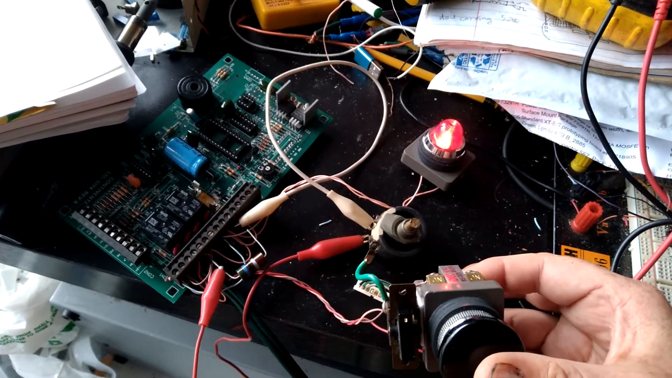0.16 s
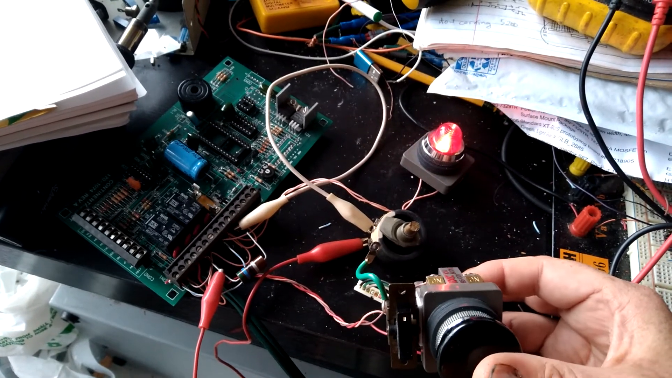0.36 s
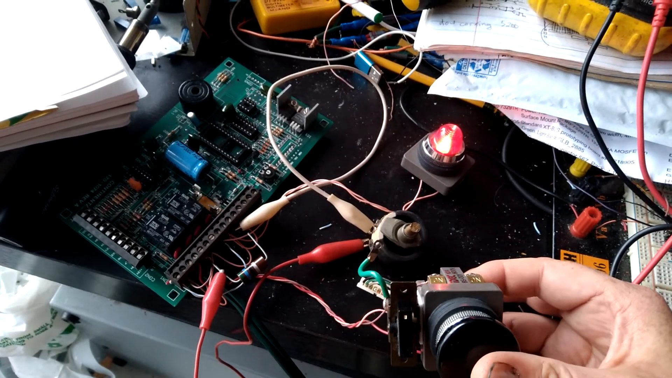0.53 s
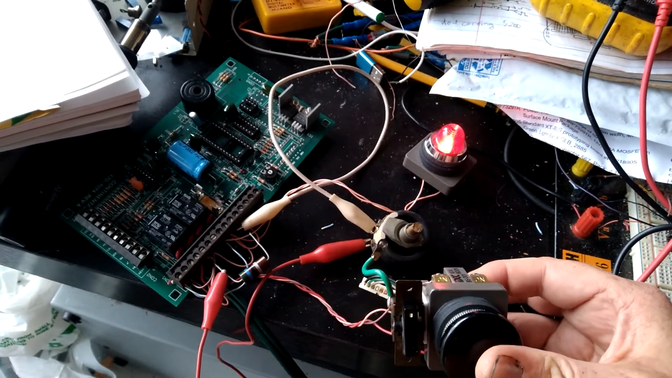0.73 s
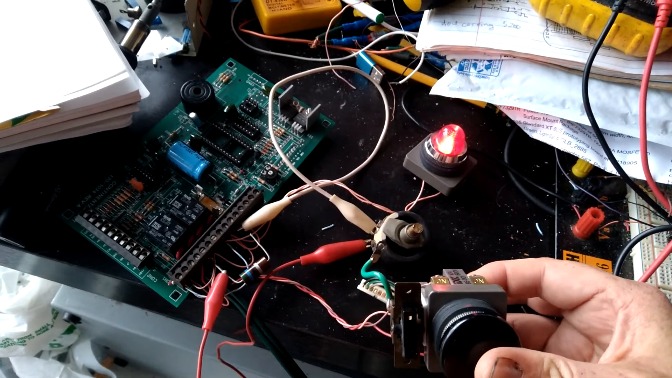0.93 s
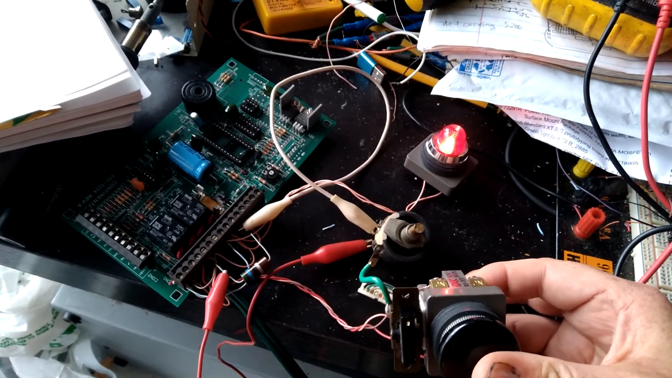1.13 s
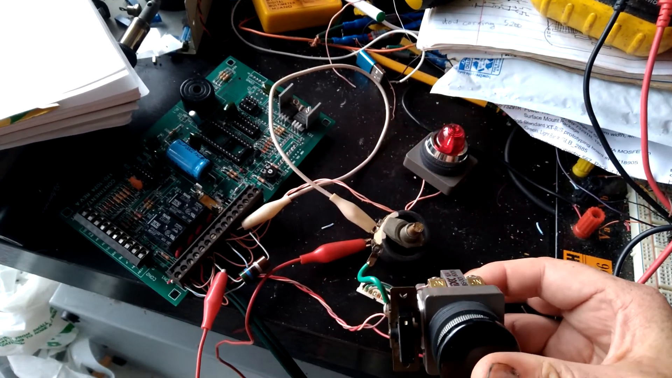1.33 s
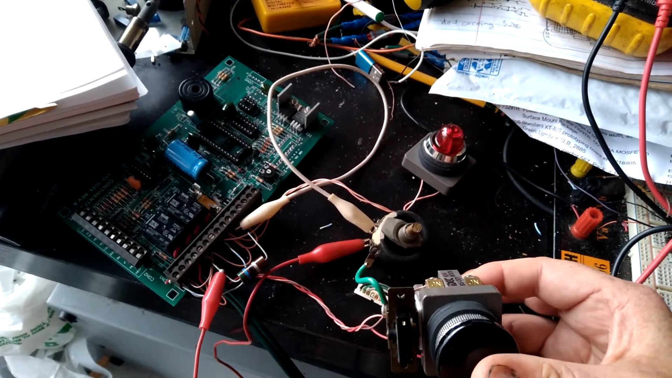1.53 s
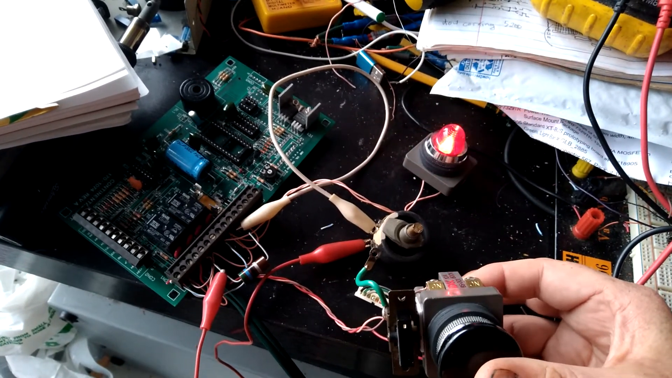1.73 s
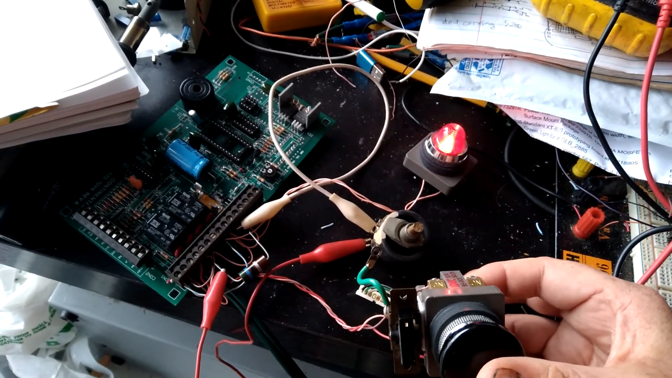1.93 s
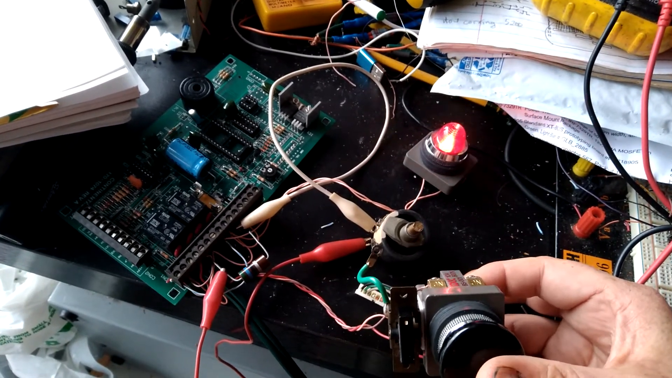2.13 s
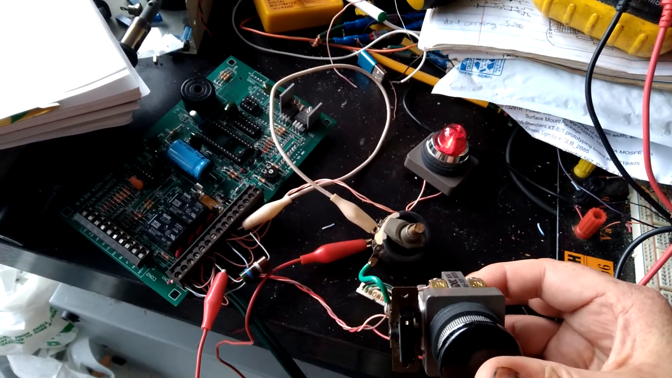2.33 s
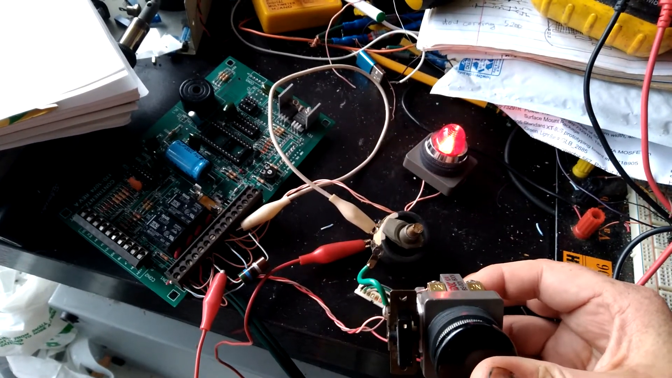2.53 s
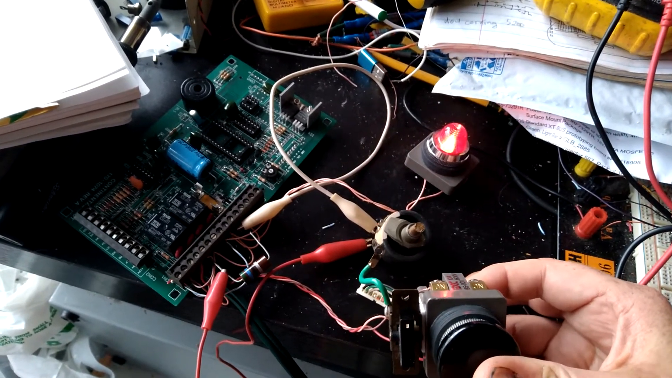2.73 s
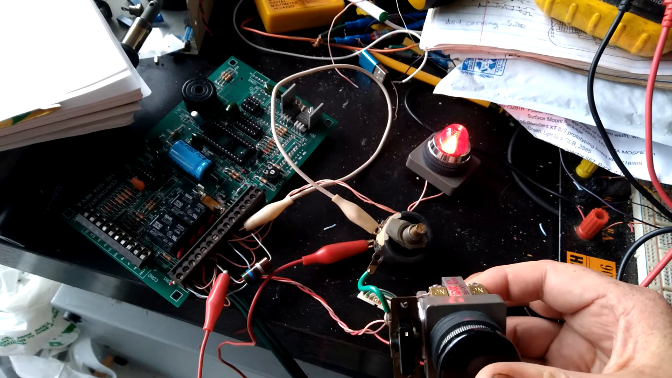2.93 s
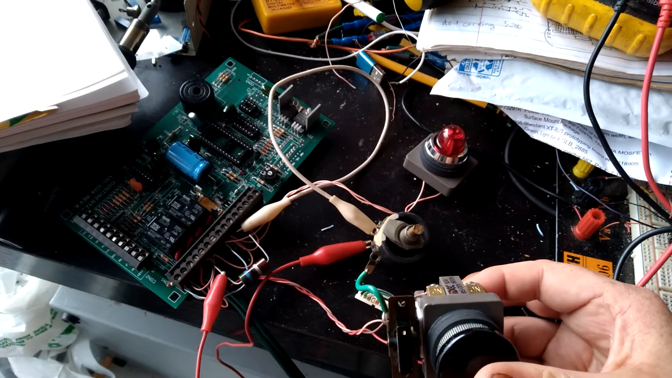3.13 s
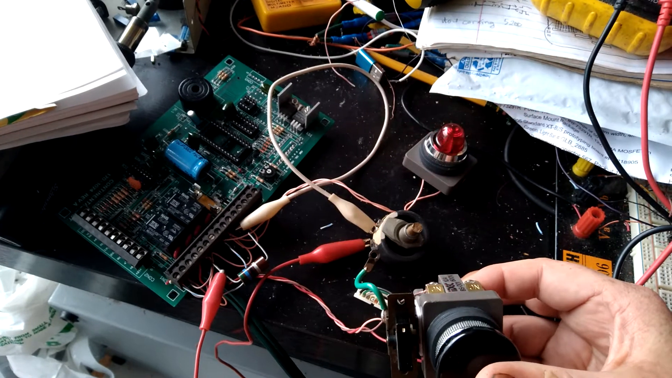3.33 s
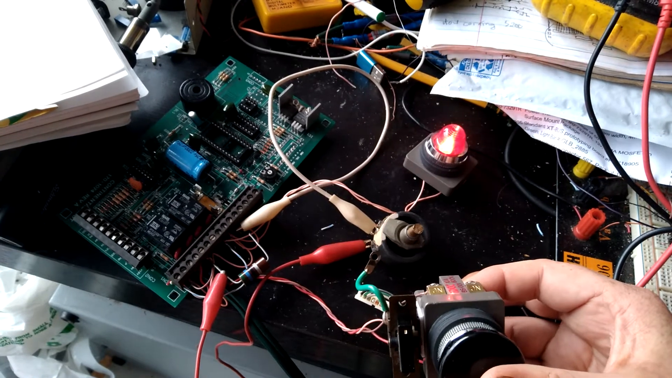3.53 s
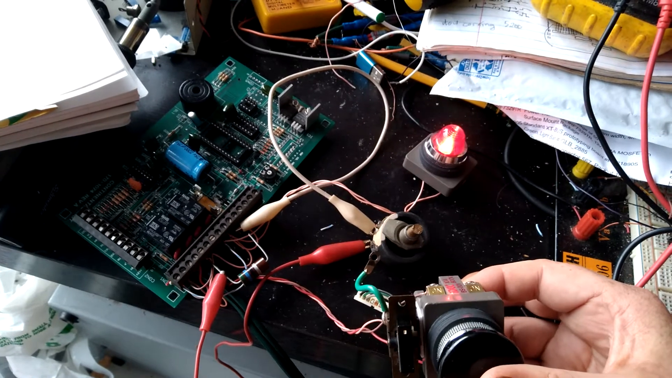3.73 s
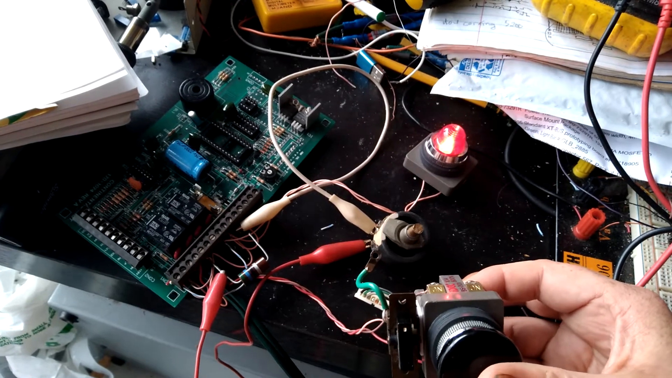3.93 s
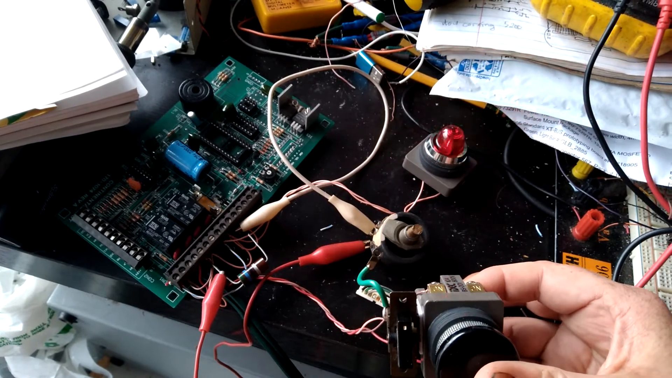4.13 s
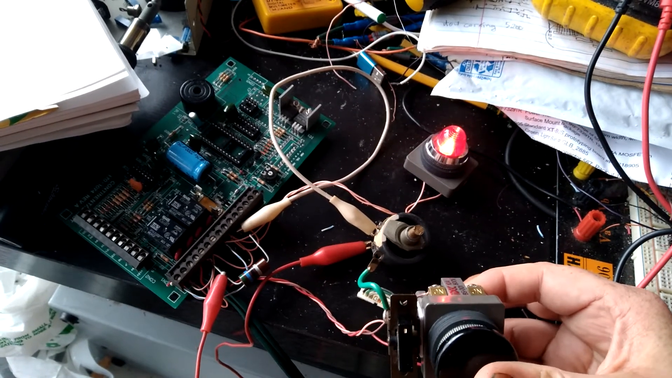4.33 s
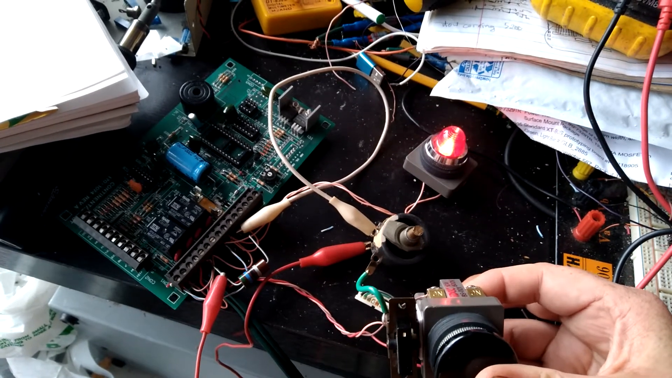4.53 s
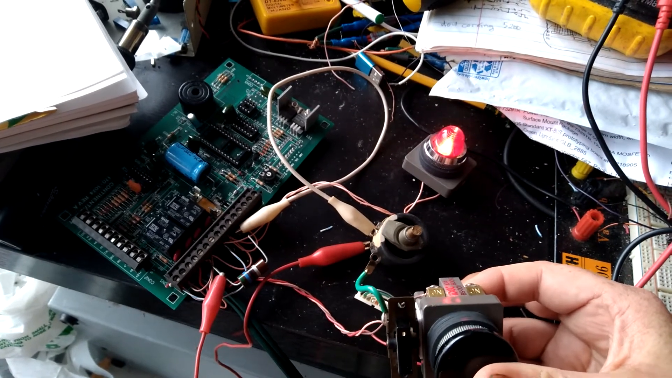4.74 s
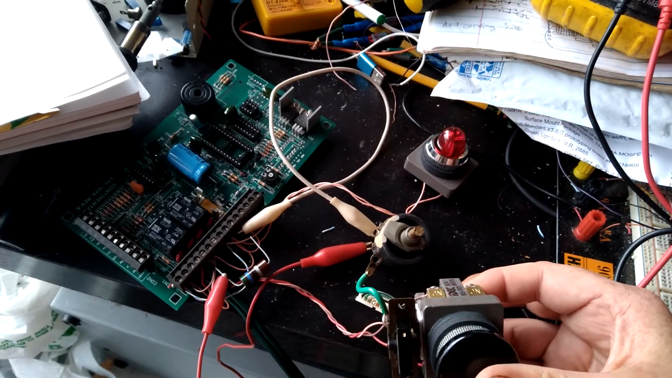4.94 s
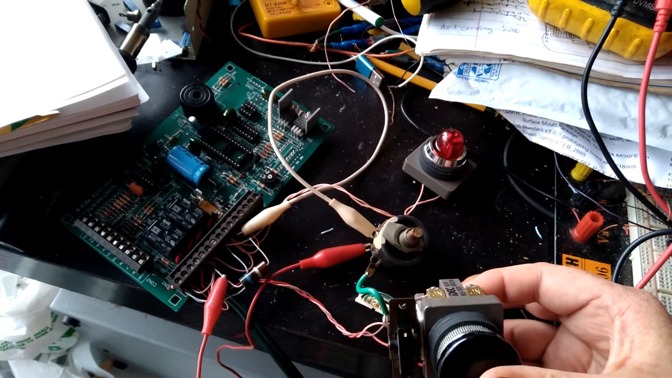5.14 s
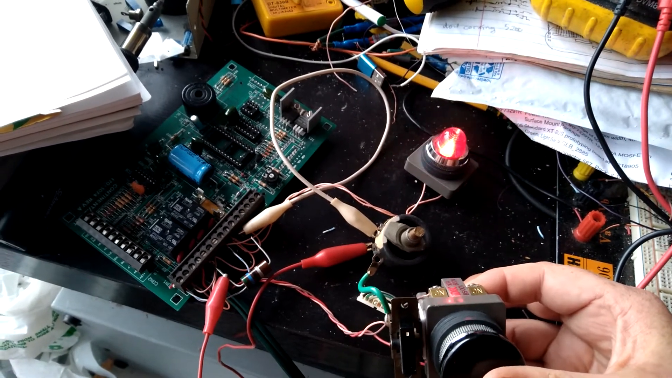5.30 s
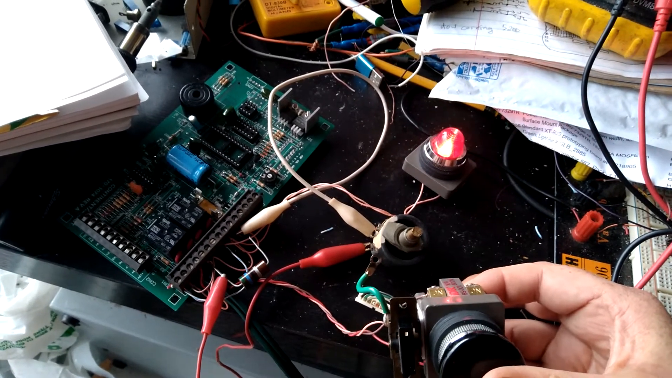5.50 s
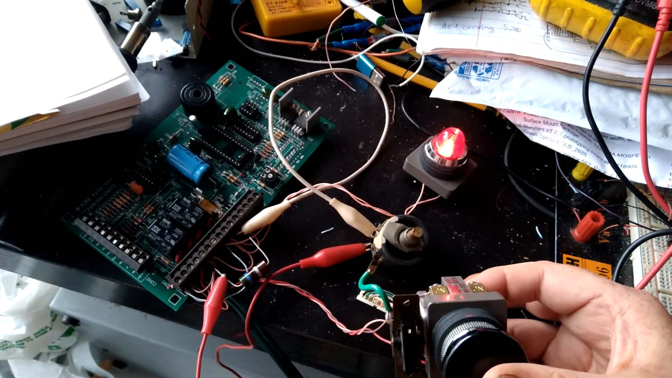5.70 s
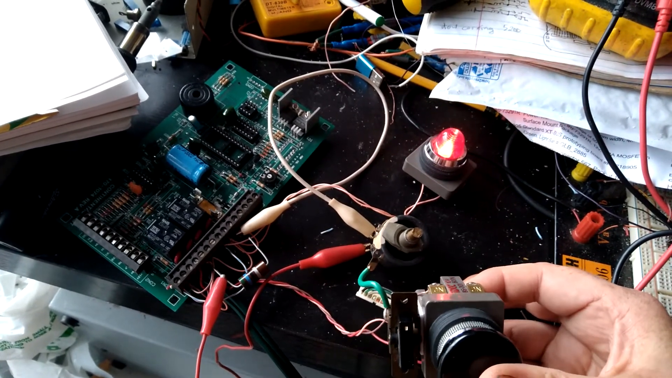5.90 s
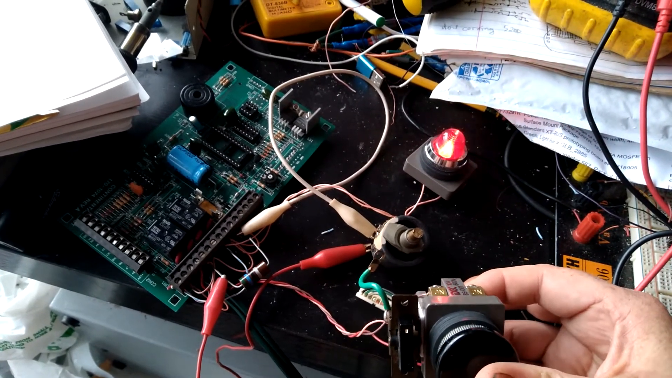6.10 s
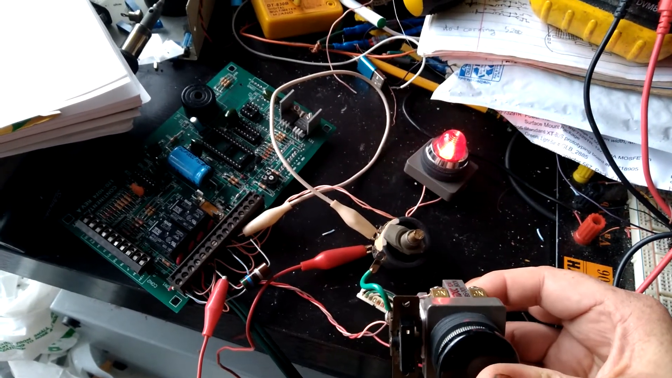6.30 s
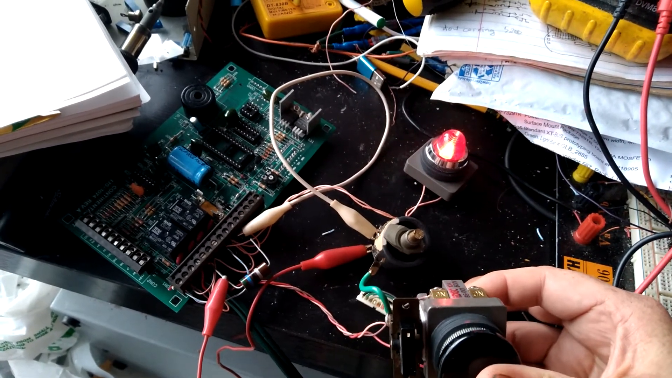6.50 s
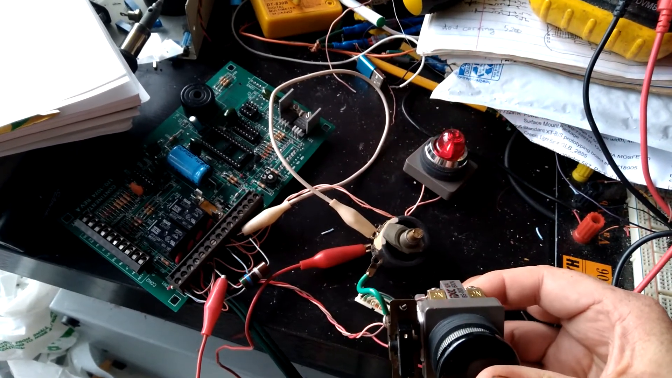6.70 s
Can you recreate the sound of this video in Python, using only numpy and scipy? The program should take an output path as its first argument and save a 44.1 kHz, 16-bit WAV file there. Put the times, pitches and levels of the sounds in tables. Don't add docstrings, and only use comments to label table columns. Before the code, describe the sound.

Dry, hard metallic switch clicks come in uneven pairs: a softer click and a very loud crack, then a softer click and a medium springy snap. They ring only briefly, with quick reflections from bench clutter and close walls. Light skin and plastic ticks scatter between strokes. Quiet low hum surges gently underneath, slight treble hiss swells around the handling, and sparrows chirp faintly outside. Close stereo pickup, clicks leaning right.

```python
import sys
import numpy as np
from scipy import signal
from scipy.io import wavfile
from scipy.ndimage import uniform_filter1d

SR = 44100
rng = np.random.default_rng(int(sys.argv[2]) if len(sys.argv) > 2 else 0)


def nominal_scale(level):
    x = np.asarray(level, float) / 20
    return 10 ** x


def dump(signal):
    limited = np.clip(np.atleast_2d(signal).T, -1, 1)
    pcm = np.round(limited * 32767).astype(np.int16)
    wavfile.write(sys.argv[1], SR, pcm)


N = 298116
SHORT, LONG, GAP = 512, 3000, 12
LEFT_LAG_SAMPLES = 10


def evened(x):
    return x / np.sqrt(np.mean(x ** 2) + 1e-20)


def read(points, hz):
    f, value = np.transpose(points)
    return np.interp(np.log(hz + 1), np.log(f + 1), value)


def add(mix, s, sound, pan_db):
    for side, lag in ((0, LEFT_LAG_SAMPLES), (1, 0)):
        part = mix[side, round(s * SR) + lag:][:len(sound)]
        part += sound[:len(part)] * nominal_scale(pan_db * (.5 - side))


def causal(points):
    hz = abs(np.fft.fftfreq(4 * SHORT, 1 / SR))
    log_gain = np.log(nominal_scale(read(points, hz)))
    click = np.fft.ifft(np.exp(np.conj(signal.hilbert(log_gain)))).real[:SHORT]
    return click / abs(click).max()


def resonate(x, hz, width_hz):
    r = np.exp(-np.pi * width_hz / SR)
    return 2 * signal.lfilter([1 - r], [1, -r * np.exp(2j * np.pi * hz / SR)], x + 0j).real


def rung(modes, t):
    return sum(nominal_scale(db - 60 * t / t60) * np.sin(2 * np.pi * hz * t) for hz, db, t60 in modes)


def tail(decays, start_s):
    uneven_db = 5
    taps = np.zeros((2, SR // 2))
    at = np.arange(0, SR // 2 - GAP, GAP)
    at = at + rng.integers(0, GAP, (2, len(at)))
    strength = rng.choice([-1., 1.], at.shape) * nominal_scale(uneven_db * rng.standard_normal(at.shape))
    onset = np.clip(at / SR / start_s - 1, 0, 1)
    np.put_along_axis(taps, at, strength * onset, 1)
    hz, t, z = signal.stft(taps, SR, nperseg=128)
    decay = nominal_scale(-60 * t / read(decays, hz)[:, None])
    taps = signal.istft(z * decay, SR, nperseg=128)[1]
    return taps / np.linalg.norm(taps[0])


def swells(rows, rise_db_per_s, fall_db_per_s, rest_db):
    t = np.arange(0, N + SHORT, GAP) / SR
    peaks = [db - np.maximum(rise_db_per_s * (s - t), fall_db_per_s * (t - s)) for s, db in rows]
    return np.repeat(np.maximum(np.max(peaks, axis=0), rest_db), GAP)[:N]


# (time [s], level [dB])
SURGES = [(0.0, 1), (.33, 9), (.65, 6), (.95, 5.5), (1.33, 7.5), (1.66, 9), (2.25, 10.5), (2.6, 3),
          (3.0, 4), (3.7, 4.5), (4.15, 8), (4.65, 4.5), (5.1, 10.5), (5.42, 7.5), (5.85, 6.5), (6.24, 10.5),
          (6.57, 11.5)]


def load_db():
    level_db = swells(SURGES, rise_db_per_s=80, fall_db_per_s=34.5, rest_db=1.5)
    return level_db - level_db.mean()


# (frequency [Hz], level [dB per Hz])
AIR = [(21, -40), (35, -16), (65, -2), (127, -1.5), (168, -8.5), (218, -8.5), (305, -19.5), (346, -16.5),
       (484, -19.5), (853, -18.5), (2000, -27.5), (3260, -37.5), (5740, -41.5), (9610, -38), (11500, -44.5),
       (15300, -40), (16500, -43)]
# (frequency [Hz], left-right likeness [-1..1])
LIKENESS = [(60, 0.93), (130, 0.92), (290, 0.85), (640, 0.35), (1410, 0.0011), (3100, -1.7), (6820, 0.44),
            (15000, -0.02)]
# (frequency [Hz], left over right [dB])
LEAN = [(60, 0), (150, -1.5), (380, 2), (950, -1), (2380, 0), (5980, -2.5), (15000, -3)]
# (frequency [Hz], left lead [rad])
LEAD = [(20, -0.3), (70, -.3), (150, -.3), (300, -.6), (600, -2), (3620, -9.5), (7060, -14), (14200, -10)]


def air():
    level_db, patch_db = -66, 1.8
    frames, hz = N // SHORT + 5, np.fft.rfftfreq(4 * SHORT, 1 / SR)
    a, b, c, d, patches = rng.standard_normal((frames, len(hz), 5)).T
    patches = uniform_filter1d(patches, size=20, axis=0)
    patches = evened(uniform_filter1d(patches, size=8, axis=1))
    same = np.clip(read(LIKENESS, hz), -1, 1)[:, None]
    left = a + 1j * b
    right = same * left + np.sqrt(1 - same ** 2) * (c + 1j * d)
    z = np.array([left, right])
    z[0] *= (nominal_scale(read(LEAN, hz)) * np.exp(1j * read(LEAD, hz)))[:, None]
    swell_db = load_db()[np.minimum(np.arange(frames) * SHORT, N - 1)]
    motor_share = read([(110, 0.8), (400, 0.0), (2000, 0.059)], hz)[:, None]
    colour_db = read(AIR, hz) + read([(2500, 3.0), (5000, -6.5)], hz)
    z *= nominal_scale(colour_db[:, None] + patch_db * patches + motor_share * swell_db)
    noise = signal.istft(z, nperseg=4 * SHORT, noverlap=3 * SHORT)[1][:, :N]
    return nominal_scale(level_db) * evened(noise)


# (frequency [Hz], width [Hz], level [dB])
HUM = [(118.2, 4.9, -69), (128.35, 5.1, -72), (205.5, 9.9, -83), (238.4, 6, -90.5), (296.8, 13, -88),
       (9500, 90, -107)]


def hum():
    swell_db = load_db()
    t, out = np.arange(N) / SR, np.zeros(N)
    for hz, width_hz, db in HUM:
        waver = resonate(rng.standard_normal(N), hz, width_hz)
        waver = evened(resonate(waver, hz, width_hz))
        steady = np.sin(2 * np.pi * (hz * t + rng.random()))
        line = steady + (0.99 + 1.1 * (hz > 150)) * waver
        out += nominal_scale(db - 2.0 + 1.2 * (hz < 150) * swell_db) * line
    return out * nominal_scale(np.array([[-1.2], [1.2]]))


# (delay [s], length [s], start [x pitch], end [x pitch], level [dB])
CHIRRUP = [(0.01, 0.053, 1, 1.09, -1), (.068, 0.059, .755, .85, 0.5), (-.015, 0.035, 0.52, 3, -9),
           (-0.0043, 0.047, 1.1, 1.6, -3.5), (0.018, .045, 1.4, 1.5, -7.5)]
CHEEP = [(0, 0.026, 1, 1, -0.94), (0.026, .034, 0.97, .76, -3.5)]
FALL = [(0.003, 0.03, 0.95, .78, -4.5)]
PEEP = [(0.0012, 0.17, 0.91, 0.99, 0.0049)]
# (time [s], pitch [Hz], level [dB])
CHIRRUPS = [(1.078, 4670, -73), (2.215, 4590, -70), (5.62, 4656, -72.5)]
CHEEPS = [(1.375, 4750, -67.5), (3.604, 4750, -68.5), (4.718, 4480, -74)]
FALLS = [(.463, 4910, -68.5), (1.22, 5440, -72.5), (1.972, 4740, -73.5), (2.035, 4274, -76.5),
         (5.8, 4600, -65.5)]
PEEPS = [(.18, 2286, -83.5), (.34, 1822, -83), (3.69, 2900, -88), (1.41, 2740, -90), (1.87, 5200, -90),
         (1.95, 5066, -84.5), (3.34, 5050, -89.5)]


def sparrows():
    wobble_hz, third_db = 139.64, -3.5
    dry, rasp = np.zeros((2, N)), rng.standard_normal((2, N))
    breath, hoarse = evened(resonate(rasp[0], 0, 430)), evened(resonate(rasp[1], 0, 900))
    songs = ((CHIRRUPS, CHIRRUP, 3.0), (CHEEPS, CHEEP, -22), (FALLS, FALL, -20), (PEEPS, PEEP, -30))
    for calls, notes, over_db in songs:
        for start, pitch_hz, db in calls:
            for delay, length, first, last, note_db in notes:
                s = start + delay
                hz = pitch_hz * np.linspace(first, last, round(length * SR))
                now = slice(round(s * SR), round(s * SR) + len(hz))
                phase = 2 * np.pi * np.cumsum(hz + wobble_hz * hoarse[now]) / SR
                partials = np.sin(2 * phase) + nominal_scale(third_db) * (first < .8) * np.sin(3 * phase)
                over_gain = nominal_scale(over_db) * first ** 5 * (first < 1.1)
                overtone = over_gain * (.5 + 0.31 * hoarse[now]) * partials
                note = (1 + 0.66 * breath[now]) * np.sin(phase) + overtone
                note = note * signal.windows.tukey(len(hz), .6)
                add(dry, s, nominal_scale(db + note_db) * note, -2.5)
    yard = tail([(3000, 0.66), (10000, 0.23)], start_s=0.0072)
    return 1.08 * dry + nominal_scale(1.04) * signal.fftconvolve(dry, yard, axes=1)[:, :N]


# (time [s], level [dB])
GRIPS = [(0.02, -80), (.4, -83), (1.1, -77), (1.5, -79.5), (2.24, -77.5), (3.0, -85), (3.2, -78),
         (3.46, -82.5), (3.9, -84), (4.5, -83.5), (5.05, -82), (5.4, -81.5), (5.9, -79), (6.5, -89)]


def gate_db():
    shut_db, open_db, reach_db = -88, -80, -68
    rise_db_per_s, fall_db_per_s = 143, 52
    strokes = [(s, db + reach_db) for s, db, *_ in PRESSES + LATCHING + RELATCHING + FREEING]
    sprung = swells(strokes, 3000, fall_db_per_s, shut_db)
    gripped = swells(GRIPS, rise_db_per_s, fall_db_per_s, shut_db)
    return np.minimum(np.maximum(sprung, gripped), open_db)


# (frequency [Hz], level [dB])
RUSTLE_COLOUR = [(2000, -13.5), (4500, -4.5), (7000, -3), (9600, -1.5), (12000, -9.5), (15600, -7.5),
                 (16200, -32)]


def rustle():
    graininess_db = 1.3 * evened(resonate(rng.standard_normal(N), 0, 300))
    grains = rng.standard_normal((2, N)) * nominal_scale(graininess_db)
    hiss = signal.fftconvolve(grains, causal(RUSTLE_COLOUR)[None], axes=1)[:, :N]
    return nominal_scale(gate_db() + 4.0) * evened(hiss)


# (time [s], level [dB])
SPRING = [(.3, -92), (.48, -90), (2.95, -88), (3.42, -88), (3.87, -89), (4.33, -89), (4.97, -90),
          (5.06, -82), (5.11, -83), (5.5, -89), (6.44, -86), (6.48, -89)]


def spring():
    hz, width_hz = 9500, 600
    rub = [resonate(resonate(row, hz, width_hz), hz, width_hz) for row in rng.standard_normal((2, N))]
    level_db = swells(SPRING, rise_db_per_s=300, fall_db_per_s=120, rest_db=-106.0)
    return nominal_scale(level_db) * evened(np.array(rub))


# (time [s], peak level [dB], left-right [dB], centre [Hz])
TICKS = [(0.3325, -57, -2, 4500), (0.3568, -62, 4.5, 7400), (0.435, -52.5, 5.5, 8850),
         (0.4997, -58, -4, 5530), (0.816, -52.5, -14.5, 9060), (0.9925, -62, -10.5, 8660),
         (1.228, -50.5, -4, 6780), (1.5728, -55.5, -8, 6280), (2.1991, -49.5, 0, 7850),
         (2.2505, -58, -9, 10000), (2.578, -51.5, -14, 6240), (2.68, -56, 0, 7920),
         (2.892, -53, -3.5, 9500), (3.149, -39, -5, 8700), (3.1897, -42.5, 2.5, 7800),
         (3.249, -47.5, -7, 7980), (3.8896, -62.5, 5, 7400), (3.9382, -42, -1, 8240),
         (3.9884, -49, -2, 5610), (4.4273, -56, -8.5, 8800), (4.529, -58, -5.5, 8880),
         (4.6161, -54.5, -7.5, 8580), (5.137, -49.5, -5, 7930), (5.1602, -59.5, 0.5, 8000),
         (5.3827, -56, -8.5, 9800), (5.8018, -55.5, 6, 7000), (5.8217, -62.5, 4.5, 4520),
         (5.847, -47.5, 4, 4070), (5.928, -58, -0.5, 6100), (5.428, -60.5, -5, 12000),
         (2.768, -69, -5, 7600), (2.79, -70, 2, 3800), (2.996, -65.5, -3, 7550), (3.197, -48.5, -13, 7860),
         (5.903, -50.5, 6.5, 5520), (6.262, -59, -5, 4500), (6.355, -59, -5, 9000), (6.38, -63, -5, 8900),
         (4.907, -57, -4, 7600), (5.051, -62, -4, 8800), (4.073, -54, -4, 6000), (.184, -66, -1.5, 2100),
         (6.6905, -48, -3, 8000), (6.5484, -60.5, -8.5, 8470), (6.6328, -45, -9, 8730)]
# (frequency [Hz], level [dB])
TICK_COLOUR = [(800, -25), (1700, -4.5), (2500, -7), (3400, -12), (6000, -2), (8700, -1), (12000, -14),
               (16500, -32)]


def ticks():
    catch_s, catch_db, catch_hz = .0178, -33, 4999
    out, t, colour = np.zeros((3, N)), np.arange(SHORT) / SR, causal(TICK_COLOUR)
    catches = [(s - catch_s, db + catch_db, pan_db + 2.0, catch_hz)
               for s, db, pan_db, *_ in LATCHING + RELATCHING]
    for s, db, pan_db, hz in TICKS + catches:
        chatter = 0.28 * rng.standard_normal(SHORT) * nominal_scale(-60 * t / 0.013)
        chatter[0] = 1
        slips = np.convolve(chatter, colour)
        slips = slips + .7 * resonate(slips, hz, 900)
        slips = slips + .6 * resonate(slips, rng.uniform(3000, 11000), 700)
        add(out, s, nominal_scale(db) * slips / abs(slips).max(), pan_db)
    out[2] = out[1]
    return out


# (frequency [Hz], level [dB], t60 [s])
BOARD = [(1110, -7.5, 0.017), (1343, 1, 0.034), (1748, 2, 0.054), (1930, .3, 0.07), (2380, -6, 0.056)]


def switch(strokes, snaps, body, colour, slide_s, spread_db, knock=(), knock_s=0.00056):
    grip_share = 0.38
    crack_db, switch_db = 10.5, -1.08
    crack_tilt = .6
    snap_spread_db, stroke_spread_db, loose = 3, 3, 0.31
    lead_pan_db = -11
    board_db, board_share = -47, 0.33
    out, t, slow = np.zeros((3, N)), np.arange(LONG // 2) / SR, np.arange(LONG) / SR
    hz, mode_db, t60 = np.transpose(body)
    t60 = grip_share * np.minimum(t60, .05)
    small = signal.butter(2, 2600, "high", fs=SR, output="sos")
    thin = signal.butter(1, 1300, "high", fs=SR)
    even = causal([(f, 0.46 * db) for f, db in colour])
    board = rung(BOARD, slow) * np.minimum(slow / 0.003, 1)
    board = board / abs(board).max()
    thump = rung(knock, slow) * np.minimum(slow / knock_s, 1)
    mean_db = np.mean(strokes, axis=0)[1]
    fade = np.exp(-t[:SHORT] / slide_s)
    habits = rng.standard_normal((len(snaps), 2 * len(hz) + SHORT))
    for s, db, pan_db, bright_db, lead_db in strokes:
        crack = causal([(f, level + crack_tilt * bright_db * np.log2(f / 8000)) for f, level in colour])
        stroke = np.zeros((2, 2 * LONG))
        for (ms, snap_db), habit in zip(snaps, habits):
            struck_db = mode_db + bright_db * np.log2(hz / 8000) + snap_spread_db * habit[:len(hz)]
            struck_db = struck_db + stroke_spread_db * rng.standard_normal(len(hz))
            ring = rung(zip(hz * (1 + 0.0024 * habit[len(hz):-SHORT]), struck_db, t60), t)
            ring = signal.sosfilt(small, ring * (1 - np.exp(-t / slide_s)))
            chatter = 0.48 * (habit[-SHORT:] + loose * rng.standard_normal(SHORT)) * fade
            chatter[0] = 1
            slide = signal.lfilter(*thin, np.convolve(chatter, crack))
            ring = ring / abs(ring).max()
            ring[:len(slide)] += nominal_scale(crack_db) * slide / abs(slide).max()
            at = 2 * SHORT + round(ms * SR / 1000)
            stroke[int(ms < 0), at:at + len(t)] += nominal_scale(snap_db + lead_db * (ms < 0)) * ring
        stroke = nominal_scale(db + switch_db) * stroke / abs(stroke).max()
        start_s = s - 2 * SHORT / SR
        add(out, start_s, stroke[0], pan_db - 6.0)
        add(out, start_s, stroke[1] * nominal_scale(lead_pan_db / 2), pan_db - 5.5 + lead_pan_db)
        smooth = signal.lfilter(*thin, even)
        out[2, round(s * SR):][:SHORT] += nominal_scale(db + switch_db + spread_db - 6.5) * smooth
        add(out, s + knock_s, nominal_scale(0.21 * (db - mean_db)) * thump, -4.0)
        add(out, s, nominal_scale(board_db + board_share * db) * board, -5.0)
    return out


# (time [s], peak level [dB], left-right [dB], brightness [dB/octave], lead-in [dB])
PRESSES = [(0.5820, -18, -4, 0.5, 0), (1.3097, -17.5, -4, -1, 2), (2.3501, -17, -7.5, 0.7, 0),
           (3.0617, -21, -6, 1.5, -3), (4.0860, -18.5, -4, .5, 0), (4.8405, -21, -3, -2, -8),
           (5.9858, -19, -4, -0.5, 1.5), (6.6951, -16.5, -5.5, 1, -3)]
# (time [ms], level [dB])
PRESS_SNAPS = [(-8.5, -35), (-4.5, -33), (-2.6, -29), (-1.2, -26), (-.3, -24), (.4, -12), (.85, 0),
               (1.8, -4), (2.6, -12), (4.2, -13), (5.6, -15), (7.4, -22), (9.6, -23), (11, -24)]
# (frequency [Hz], level [dB], t60 [s])
PRESS_BODY = [(2555, -5, 0.098), (3442, -16, 0.074), (3770, -6, 0.039), (4500, -4, 0.024),
              (4820, 3.5, 0.092), (5510, -9, 0.015), (6578, 2, 0.03), (7300, 1.5, 0.022),
              (8750, -16, 0.014), (8700, -26, 0.018), (9460, 2, 0.034), (10300, -21, 0.016),
              (11800, -3, 0.033), (14500, -9, 0.033)]
# (frequency [Hz], level [dB])
PRESS_CRACK = [(410, -67), (700, -40.5), (1800, -31), (2700, -22), (3400, -19), (4900, -4), (5810, -19),
               (6630, .5), (7770, -11), (8410, -3.5), (9600, -1), (10300, -8), (11100, -14), (11800, -8),
               (13300, -27), (15200, -19), (16500, -38.5)]
# (frequency [Hz], level [dB], t60 [s])
KNOCK = [(328.6, -65, 0.12), (396, -65, 0.24), (540, -69, 0.038), (782, -62, 0.056), (847, -61, 0.11),
         (929, -67, 0.055)]


def presses():
    return switch(PRESSES, PRESS_SNAPS, PRESS_BODY, PRESS_CRACK, slide_s=0.0007, spread_db=12.3,
                  knock=KNOCK, knock_s=0.00597)


# (time [s], peak level [dB], left-right [dB], brightness [dB/octave], lead-in [dB])
LATCHING = [
    (0.7223, -3, -0.5, -.7, -3),
    (2.4793, -2, -2.5, -.3, -5),
]
# (time [ms], level [dB])
LATCH_SNAPS = [(-17.8, -31), (-16.3, -31), (-8.8, -36), (-6, -33), (-4, -35), (-2.5, -31), (-1, -28),
               (.6, -2), (1.0, 0), (1.75, -13), (2.45, -11), (3.25, -13), (4.6, -20), (6.6, -22),
               (8.4, -29)]
# (frequency [Hz], level [dB], t60 [s])
LATCH_BODY = [(1760, -32.5, 0.062), (2370, -32.5, 0.065), (3305, -21.5, .03), (4750, -10.5, .05),
              (5271, -25, .03), (7100, -12.5, 0.031), (8560, -3, 0.044), (9074, -9, 0.025),
              (9684, -8.5, 0.024), (10050, -10, .03), (11000, 4.5, .05), (11550, -11, .03),
              (12000, -13, .03), (14850, -26.5, .02)]
# (frequency [Hz], level [dB])
LATCH_CRACK = [(410, -69.5), (700, -44.5), (2600, -37), (3300, -24), (3900, -28.5), (4400, -21), (4760, -7),
               (5200, -19), (5800, -21), (6500, -30.5), (7170, -13), (8800, -2), (9400, -8), (10300, -3),
               (11000, 2.5), (11700, -8), (13000, -21), (15200, -29), (16500, -45)]
# (frequency [Hz], level [dB], t60 [s])
THUD = [(420, -61.5, .04), (573, -58.5, 0.042), (700, -62, .03), (830, -61.5, 0.076), (1330, -61, .05)]


def latches():
    return switch(LATCHING, LATCH_SNAPS, LATCH_BODY, LATCH_CRACK, slide_s=0.00016, spread_db=2.8, knock=THUD)


# (time [s], peak level [dB], left-right [dB], brightness [dB/octave], lead-in [dB])
RELATCHING = [
    (4.2318, -4.5, -2, .3, .3),
    (6.1128, -2.8, -2, .3, -4),
]
# (time [ms], level [dB])
RELATCH_SNAPS = [(-17.3, -32), (-15.8, -31), (-8.8, -33), (-6, -32), (-4, -35), (-2.5, -31), (-1, -26),
                 (.6, -1), (1.0, -1), (1.4, -1), (2.7, -11), (3.1, -9), (3.45, -11), (4.6, -20), (6.3, -22),
                 (7.6, -29)]
# (frequency [Hz], level [dB], t60 [s])
RELATCH_BODY = [(1920, -24.5, 0.07), (2800, -40, 0.045), (3400, -21.5, 0.038), (4750, -11, .05),
                (5240, -18, .03), (7330, -12, 0.029), (8220, -3, 0.043), (8800, -4, .03), (9290, -5, 0.034),
                (10800, -4, 0.025), (11700, -6, 0.05), (11850, -3, 0.026), (11560, -14.5, .03),
                (14700, -24.5, .02)]
# (frequency [Hz], level [dB])
RELATCH_CRACK = [(410, -72), (700, -47), (2600, -38), (3900, -27), (4400, -22), (4760, -9), (5200, -21),
                 (6600, -30), (7300, -13), (9600, -1.5), (11000, -5), (11800, -2.5), (13000, -22),
                 (14900, -19), (16500, -40)]


def relatches():
    return switch(RELATCHING, RELATCH_SNAPS, RELATCH_BODY, RELATCH_CRACK, slide_s=0.00032, spread_db=4.5,
                  knock=THUD)


# (time [s], peak level [dB], left-right [dB], brightness [dB/octave], lead-in [dB])
FREEING = [
    (1.7455, -12, -6, .3, -1.5),
    (3.506, -11, -6.5, .7, 1.5),
    (5.2656, -11, -5.5, 1.5, 1.5),
]
# (time [ms], level [dB])
FREE_SNAPS = [(-5.5, -40), (-4, -36), (-2.4, -23), (-.9, -28), (.4, -3), (.75, 0), (1.15, -4), (2.0, -11),
              (2.55, -6), (2.95, -9), (4.3, -22), (7.3, -23), (5.6, -28)]
# (frequency [Hz], level [dB], t60 [s])
FREE_BODY = [(1943, -27, 0.046), (2680, -29.5, .04), (3442, -27.5, .03), (4750, -5, 0.025),
             (5200, -22, 0.054), (7400, -24, 0.047), (8030, -14.5, 0.011), (8790, -3, 0.012),
             (9500, -8.5, 0.012), (10600, -18.5, 0.01), (11060, -6, 0.026), (11280, -10, 0.047),
             (12120, -14.5, 0.0098), (15500, -21, 0.032)]
# (frequency [Hz], level [dB])
FREE_CRACK = [(410, -66), (700, -35), (1550, -37.5), (4000, -30), (4450, -18), (4800, -5), (5200, -17),
              (5800, -33), (6500, -33), (7200, -21.5), (8080, -11.5), (8980, -1), (11100, -1), (12500, -15),
              (13800, -28), (15000, -19), (16500, -34.5)]


def releases():
    return switch(FREEING, FREE_SNAPS, FREE_BODY, FREE_CRACK, slide_s=0.00045, spread_db=5.5)


# (delay [ms], left [dB], right [dB])
BENCH = [(1.1026, -16.5, -17), (3.39, -21, -23), (5.205, -27, -26.5), (9.34, -19.5, -31.5),
         (10.66, -33, -33.5), (14.51, -29.5, -30.5), (18.326, -37, -33), (23.6, -36.5, -37),
         (25.6, -39.5, -34), (31.3, -41, -34), (34.5, -43.5, -41)]
# (frequency [Hz], t60 [s])
ROOM = [(500, 0.18), (2000, 0.21), (5000, 0.15), (10500, 0.235), (13000, .13), (16500, 0.18)]


def echoes(direct, spread):
    bench = np.zeros((2, LONG))
    for ms, left_db, right_db in BENCH:
        bench[:, round(ms * SR / 1000)] += nominal_scale(np.array([left_db, right_db]))
    walls = nominal_scale(-12.0) * tail(ROOM, start_s=0.0023)
    walls += nominal_scale(-34.5) * tail([(1000, 0.44), (10000, 0.51)], start_s=0.048)
    near = signal.fftconvolve(direct[1:], bench, axes=1)[:, :N]
    return near + signal.fftconvolve(spread, walls, axes=1)[:, :N]


# (frequency [Hz], gain [dB])
LEFT_PORT = [(1000, 0), (3800, 4), (4800, 0.5), (5800, 1), (6500, 7), (9000, -1.5), (9400, -9), (9800, -3),
             (11200, 2), (14000, 4), (15600, 6.5)]
# (frequency [Hz], gain [dB])
RIGHT_PORT = [(1000, -2), (3800, -1), (4900, 0.3), (6500, 1), (8700, -0.15), (11500, 1), (14000, -2.2)]


def ported(x):
    taps = []
    for port in (LEFT_PORT, RIGHT_PORT):
        tap = causal(port)
        taps.append(tap * nominal_scale(port[0][1]) / tap.sum())
    return signal.oaconvolve(x, np.array(taps), axes=1)[:, :N]


def scene():
    near = presses() + latches() + relatches() + releases() + ticks()
    direct, spread = near[:2], near[2:]
    diffuse = air() + hum() + sparrows() + rustle() + spring() + echoes(direct, spread)
    dulled = signal.firwin(255, 15850, window=("kaiser", 8), fs=SR)
    return ported(direct) + signal.oaconvolve(diffuse, dulled[None], "same")


def top_cut(x):
    return signal.sosfilt(signal.butter(12, 16800, fs=SR, output="sos"), x)


def record(dry):
    cut = signal.sosfilt(signal.butter(3, 48, "high", fs=SR, output="sos"), dry)
    limited = np.clip(cut, -.96, .96)
    edge = signal.firwin(255, 16450, window=("kaiser", 12), fs=SR)
    return top_cut(signal.oaconvolve(limited, edge[None], "same"))


dry = scene()
out = record(dry)
dump(out)
```